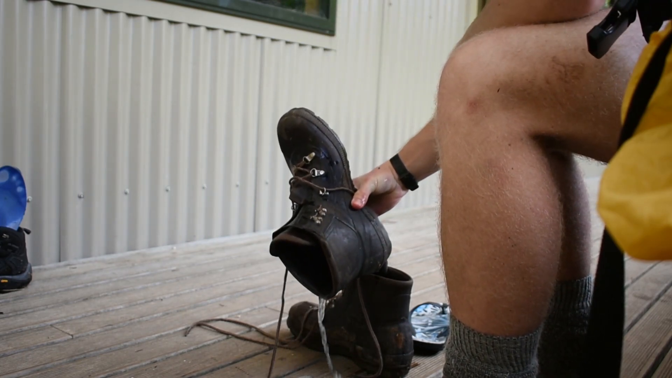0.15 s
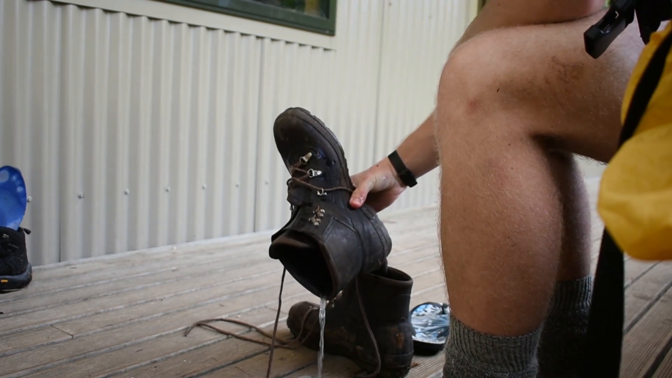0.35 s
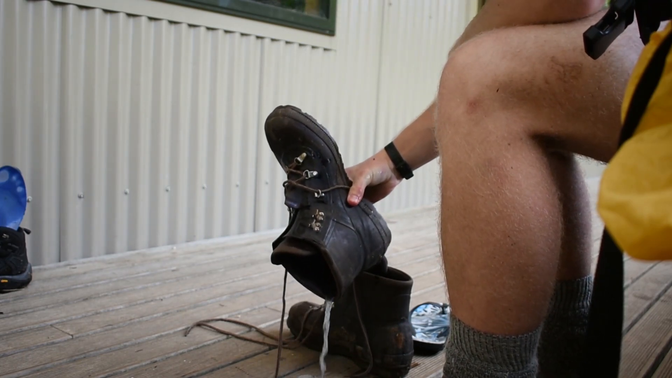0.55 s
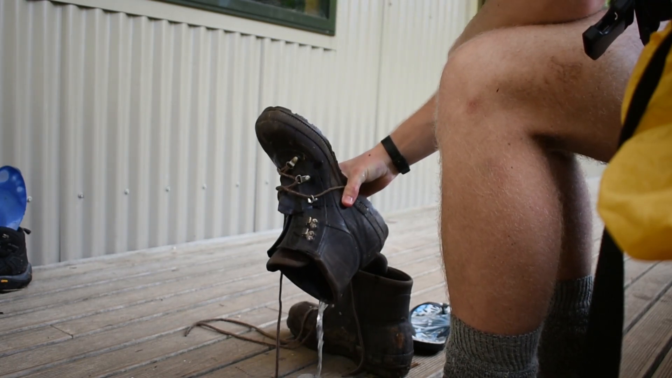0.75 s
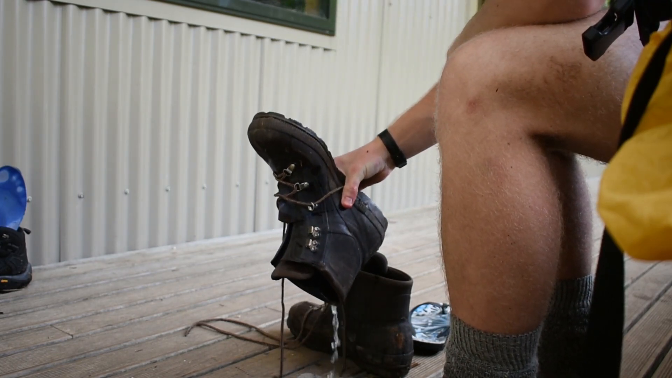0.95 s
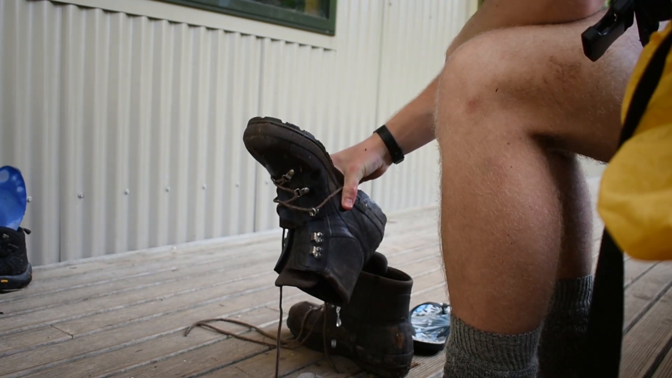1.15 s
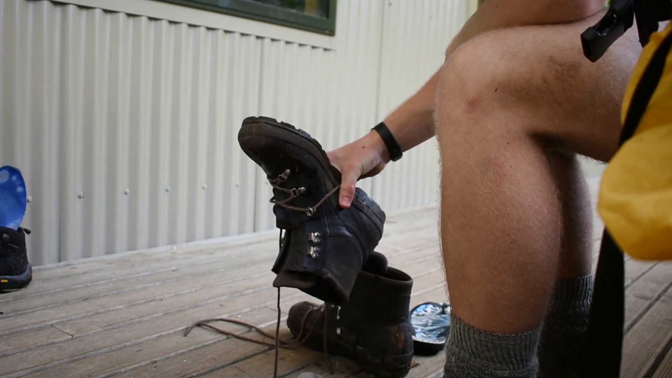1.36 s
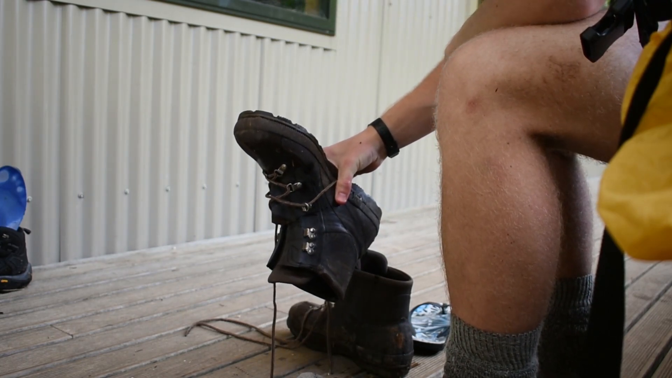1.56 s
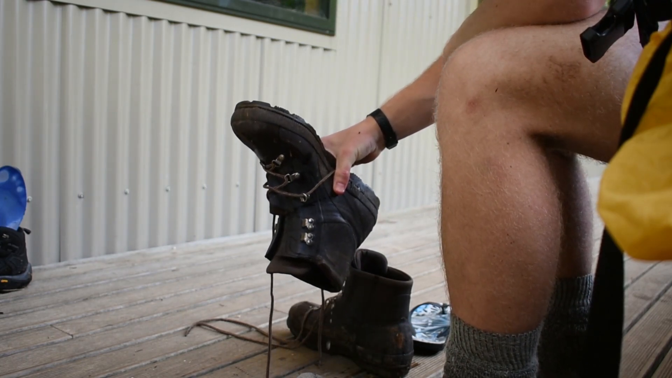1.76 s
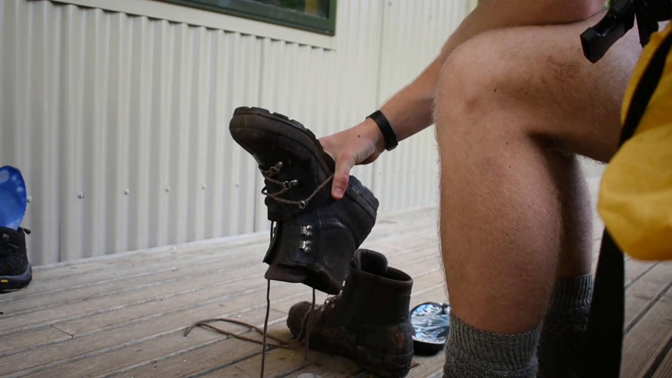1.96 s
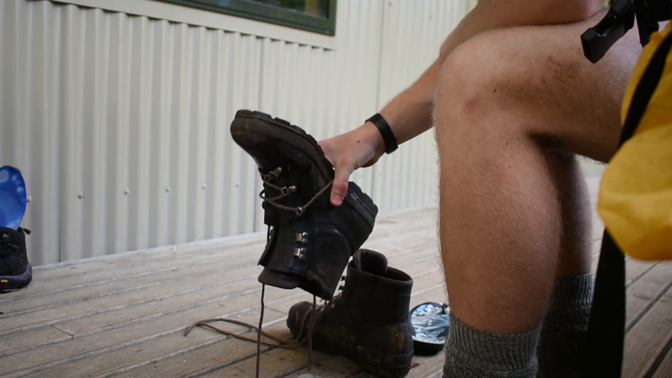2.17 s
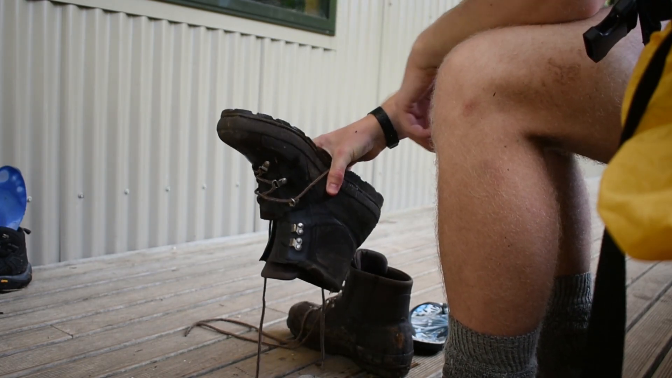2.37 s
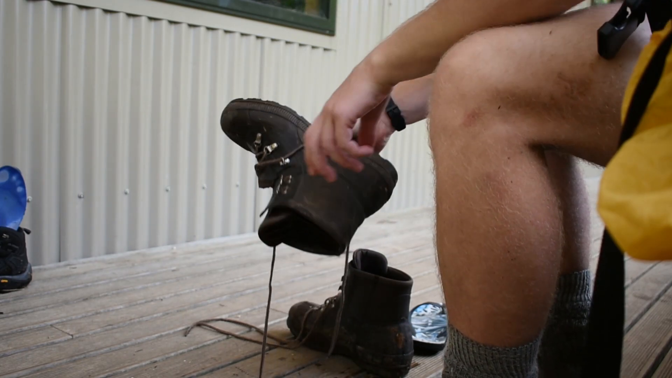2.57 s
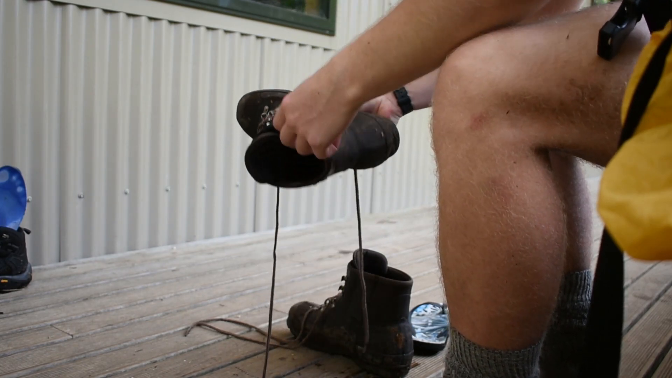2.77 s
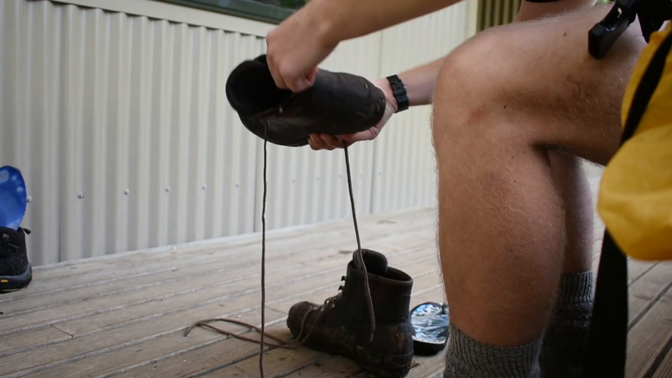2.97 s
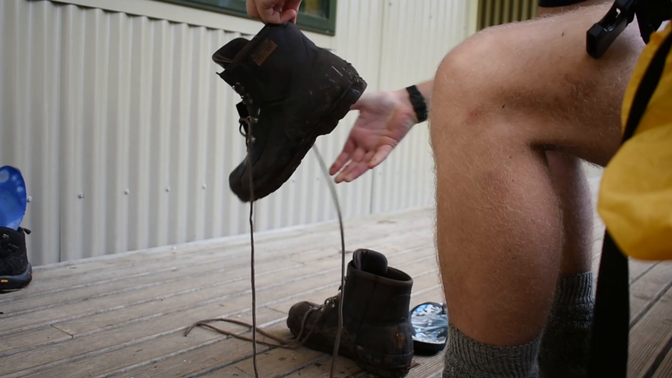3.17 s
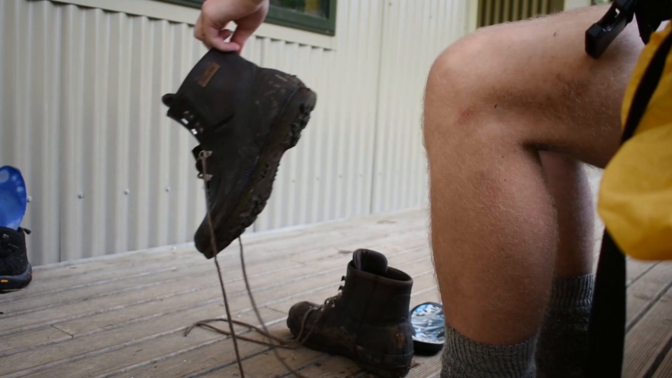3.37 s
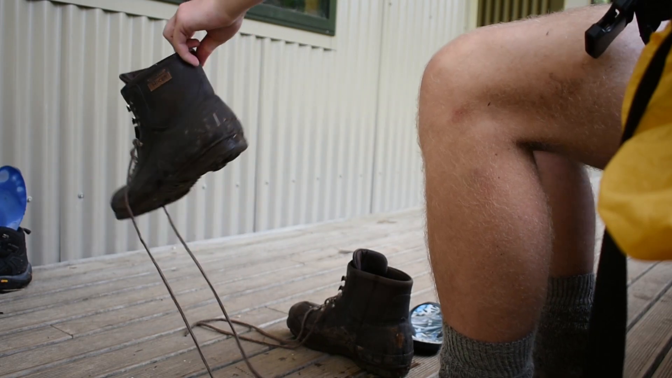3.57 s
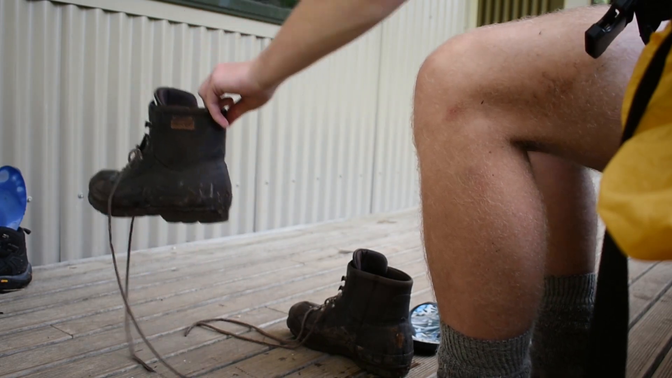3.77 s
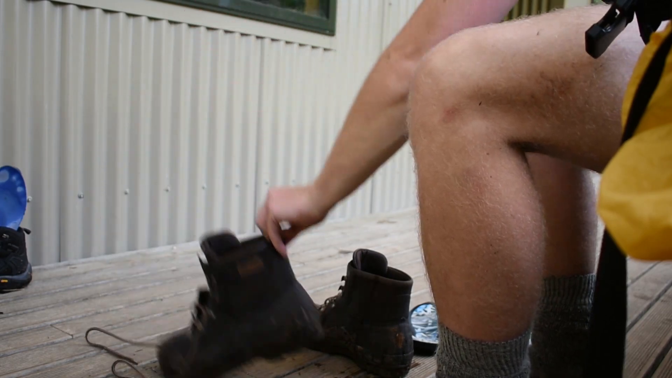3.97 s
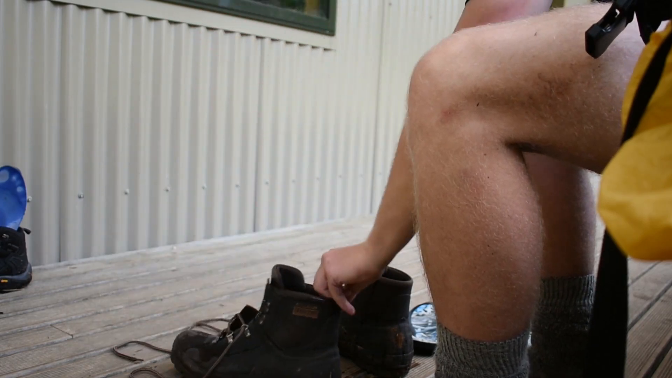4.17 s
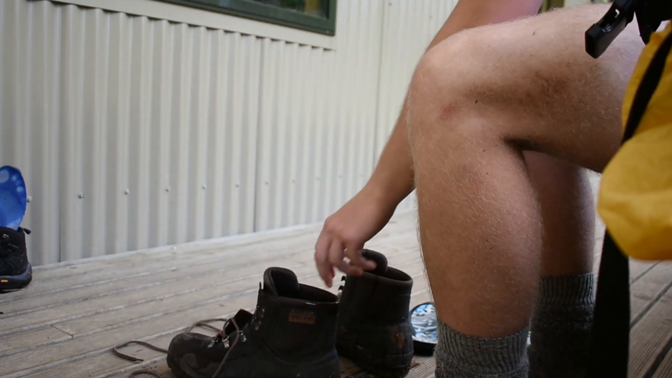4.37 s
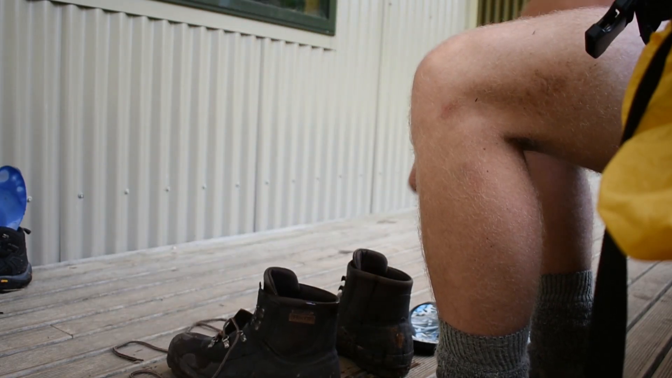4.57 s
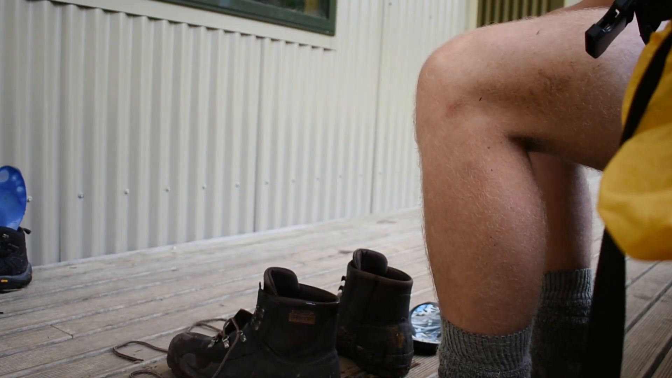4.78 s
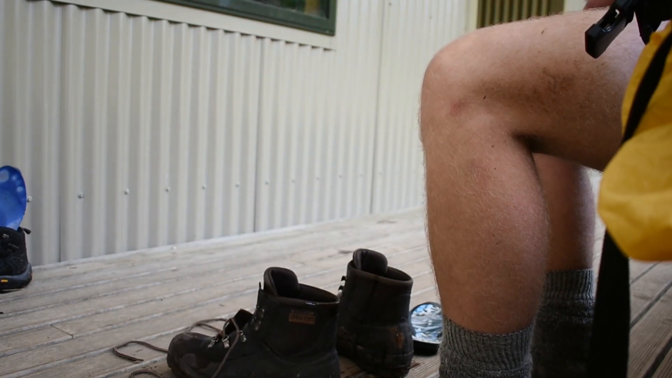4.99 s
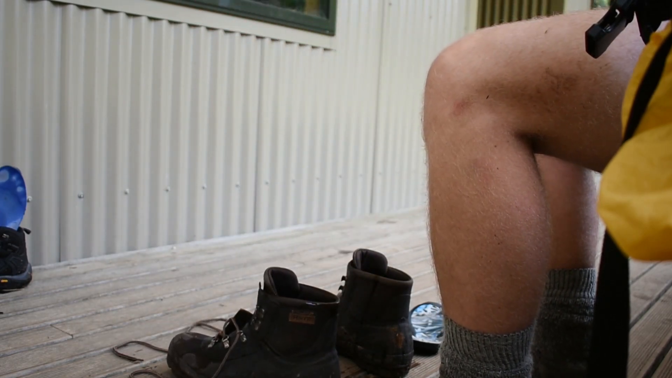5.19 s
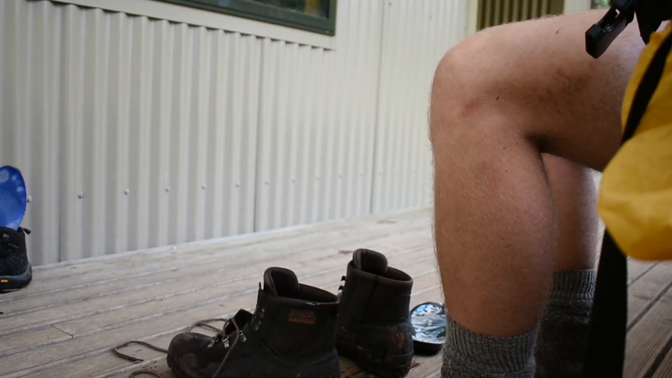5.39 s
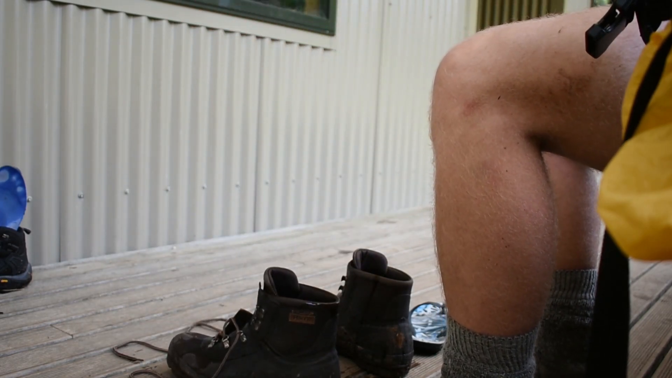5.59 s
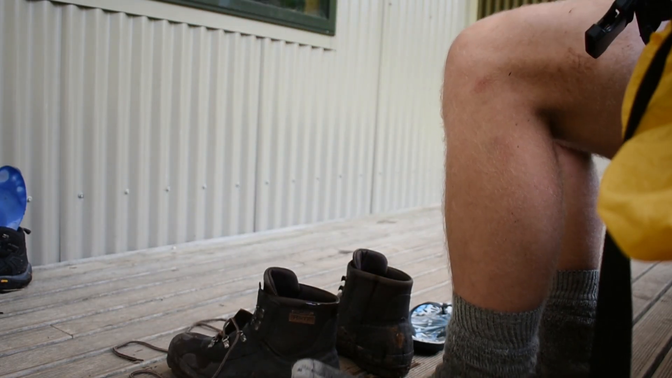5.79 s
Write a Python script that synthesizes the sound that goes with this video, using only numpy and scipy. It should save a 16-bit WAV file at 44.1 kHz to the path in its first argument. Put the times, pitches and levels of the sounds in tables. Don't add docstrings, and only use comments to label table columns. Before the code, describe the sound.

Bright wet splats and fine patter hit wooden planks a step away, strongest early, fading to a dribble. Leather rubs and fingers click on the boot, which then lands hard, planks and hollow leather ringing briefly with a bouncing metallic rattle. Afterwards come soft cloth scuffs on wood. Behind it, a shrill cicada repeats buzzes and chirps, hoarse birds call early, and thin whistles follow, with short porch reflections and a quiet airy background.

```python
import sys
import numpy as np
from scipy import signal
from scipy.fft import rfft, irfft
from scipy.io import wavfile
from scipy.ndimage import uniform_filter1d

SR = 44100
rng = np.random.default_rng(int(sys.argv[2]) if len(sys.argv) > 2 else 0)


def amplitude_ratio(level_db):
    exponent = np.asarray(level_db, float) / 20
    return 10 ** exponent


def waveform_to_disk(signal):
    frames = np.transpose(np.atleast_2d(signal))
    scaled = np.clip(frames, -1, 1) * 32767
    samples = np.round(scaled).astype(np.int16)
    wavfile.write(sys.argv[1], SR, samples)


N = 257544


def evened(x):
    return x / np.sqrt(np.mean(x ** 2) + 1e-20)


def wander(size, smooth):
    return evened(uniform_filter1d(rng.standard_normal(size), smooth))


def read(points, hz):
    f, value = np.transpose(points)
    return np.interp(np.log(hz + 1), np.log(f + 1), value)


def add(mix, s, sound):
    part = mix[round(s * SR):][:len(sound)]
    part += sound[:len(part)]


def coloured(x, points):
    gain = amplitude_ratio(read(points, np.fft.rfftfreq(len(x), 1 / SR)))
    return evened(irfft(rfft(x) * gain, len(x)))


def resonate(x, hz, width):
    turn = np.exp(2j * np.pi * np.cumsum(hz * np.ones(len(x))) / SR)
    r = np.exp(-np.pi * width / SR)
    return 2 * (turn * signal.lfilter([1 - r], [1, -r], x / turn)).real


def resonate_twice(x, hz, width):
    return resonate(resonate(x, hz, width), hz, width)


def grit(size, per_s, spread_db):
    chance = rng.random(size)
    sign = rng.standard_normal(size)
    big = rng.exponential(1, size)
    return (chance < per_s / SR) * sign * amplitude_ratio(spread_db * np.minimum(big, 4))


def swell(peak_s, db, rise, fall, depth_db, roundness=1):
    t = np.arange(-rise, 2 * fall, 1 / SR)[max(round((rise - peak_s) * SR), 0):]
    return max(peak_s - rise, 0), db + depth_db * np.where(t < 0, -t / rise, t / fall) ** roundness


def swells(rows, floor_db, depth_db):
    out = np.full(N, amplitude_ratio(floor_db))
    for row in rows:
        s, db = swell(*row, depth_db)
        add(out, s, amplitude_ratio(db) * signal.windows.tukey(len(db), .1))
    return out


def knocked(rows):
    out, t = np.zeros(N), np.arange(9000) / SR
    for s, db, hz, t60 in rows:
        note = np.sin(2 * np.pi * hz * t) * np.minimum(2 * hz * t, 1)
        add(out, s, amplitude_ratio(db - 60 * t / t60) * note)
    return out


def burst(db, hz, t60, share, tail_db, crack_s):
    t, hz = np.arange(5000) / SR, min(hz, 15000)
    spray = evened(resonate_twice(grit(len(t), 16000, 1.5), hz, share * hz))[::-1]
    crack = (t / crack_s) * np.exp(1 - t / crack_s)
    crack *= 2 / abs(spray[:round((3 * crack_s + 1 / hz) * SR)]).max()
    tail = amplitude_ratio(tail_db - 60 * t / max(t60, .005)) * np.minimum(t / crack_s, 1)
    return amplitude_ratio(db - 6.5) * spray * (crack + tail)


# frequency in Hz, level in dB per Hz.
VALLEY_HUSH = [(18, -28), (30, -28), (53, -48), (86, -16.5), (469, 1), (610, 0), (1210, 0.5), (3180, -4.5),
               (4470, -4.5), (4960, -7), (10300, -11), (13100, -12), (14500, -10.5), (15700, -10.5)]
# peak in seconds, level in dB, rise in seconds, fall in seconds.
BUMPS = [
    (2.86, -81, 0.079, 0.08),
    (3.78, -80.5, 0.063, 0.2203),
    (4.24, -65.5, 0.23, 0.38),
    (4.68, -72, 0.14, 0.252),
    (5.71, -83, 0.098, 0.0938),
]
# start in seconds, peak in dB, pitch in Hz, t60 in seconds.
HEEL_THUMPS = [
    (2.893, -63, 65, 0.15),
    (5.7, -72, 60, .2),
]


def hush():
    hush_db, rumble_db, bump_depth_db = -57, -93, -18
    waver = wander(N, 3000)
    air = coloured(rng.standard_normal(N), VALLEY_HUSH) * amplitude_ratio(hush_db + .5 * waver)
    rumble = evened(resonate_twice(rng.standard_normal(N), 56, 54))
    return air + knocked(HEEL_THUMPS) + rumble * swells(BUMPS, rumble_db, bump_depth_db)


# start in seconds, length in seconds, top pitch in Hz, peak in dB.
SQUAWKS = [
    (0.27, 0.048, 1173, -48.5),
    (1.015, 0.056, 1181, -49.5),
    (1.163, 0.043, 1200, -56),
    (1.743, 0.048, 1200, -49.5),
]
# level in dB of each overtone, from the fundamental up.
SQUAWK_OVERTONES = [-25, -6, 2, 1, -3, -9, -13]
# delay in seconds, level in dB.
SLOPE_ECHOES = [(.017, -11), (.034, -14), (.052, -20)]
# start in seconds, length in seconds, pitch in Hz, level in dB, fuzz in Hz.
WHISTLES = [
    (1.652, 0.039, 5130, -63, 180),
    (2.08, 0.085, 4550, -65, 34),
    (2.29, 0.1, 4505, -66.5, 19),
    (2.399, 0.13, 4430, -70, 26),
    (2.66, 0.13, 4180, -70, 60),
    (3.032, 0.093, 1831, -63.5, 14),
    (3.378, 0.57, 4170, -69.5, 60),
    (4.87, 0.043, 1280, -64.5, 20),
    (5.138, 0.022, 5200, -64, 30),
    (5.71, 0.078, 4500, -64, 19),
]


def squawk(length, top_hz, top_db):
    size = round(length * SR)
    u = np.linspace(0, 1, size)
    start, hoarse = .75, .25
    hz = top_hz * (start + (1 - start) * u ** .9)
    db = top_db + np.interp(u, [0, 0.75, 1], [-13, 0, 4])
    turns = np.cumsum(hz * (1 + 0.018 * wander(size, 90))) / SR
    stack = np.zeros(size)
    for k, level in enumerate(SQUAWK_OVERTONES):
        stack += amplitude_ratio(level + 2.2 * wander(size, 220)) * np.cos(2 * np.pi * (k + 1) * turns)
    stack = evened(stack) * (1 - hoarse + hoarse * wander(size, 40))
    flutter = 1 + 0.37 * wander(size, 150)
    return amplitude_ratio(db) * evened(stack) * flutter * signal.windows.tukey(size, .2)


def birds():
    out = np.zeros(N)
    for s, length, top_hz, top_db in SQUAWKS:
        call = squawk(length, top_hz, top_db)
        add(out, s, call)
        for delay, echo_db in SLOPE_ECHOES:
            add(out, s + delay, amplitude_ratio(echo_db + 4.4 * wander(len(call), 200)) * call)
    for s, length, hz, db, fuzz in WHISTLES:
        size = round(length * SR)
        waver = wander(SR, 500)[:size]
        tone = np.sin(2 * np.pi * np.cumsum(hz + fuzz * waver) / SR) * (1 + 0.27 * waver[::-1])
        add(out, s, amplitude_ratio(db) * evened(tone) * signal.windows.tukey(size, .4))
    return out


# buzz start in seconds, level in dB, slow ticking before it in
# seconds, thin high note in dB.
CICADA_PHRASES = [
    (.17, -54.5, .155, -60),
    (1.708, -54, .307, -61),
    (3.212, -53.5, .353, -70),
    (4.837, -52, .295, -62),
]
# start in seconds, level in dB.
CHIRPS = [(.507, -55), (.703, -53), (.917, -55), (1.136, -55), (1.328, -65), (2.059, -55), (2.26, -54.5),
          (2.46, -55), (2.663, -53), (3.542, -54.5), (3.732, -54.5), (3.927, -54.5), (4.324, -54),
          (4.495, -61), (5.154, -54.5), (5.344, -52.5), (5.539, -52), (5.744, -54)]
# frequency in Hz, width in Hz, level in dB.
TYMBAL = [(11200, 130, -9), (11860, 100, -9), (12340, 37, -6), (12800, 53, -2), (13200, 68, 4),
          (14600, 120, 1), (15000, 51, -2), (15000, 23, -4)]
# peak in seconds, level in dB, rise in seconds, fall in seconds.
FAR_CICADAS = [
    (.96, -63, 0.0446, 0.0884),
    (1.35, -69, 0.322, 0.1884),
    (1.97, -78.5, 0.1027, 0.077),
    (2.35, -73, 0.309, 0.598),
    (3.62, -62, 0.1318, 0.045),
    (3.89, -65, 0.1267, 0.09),
    (5.11, -67, 0.0505, .05),
    (5.6, -74, 0.1025, 0.089),
]


def cicada_ticks():
    ticks, t = np.zeros(N), np.arange(900) / SR
    tick = amplitude_ratio(-60 * t / 0.041) * np.minimum(t / .0007, 1)
    quicken_s, quicken, quickest_s, merge_s = -.062, .7, .0118, .075
    for buzz, _, lead, _ in CICADA_PHRASES:
        gap = 1 / 23
        times = list(np.arange(buzz + quicken_s, max(buzz - lead, 0), -gap)[::-1])
        while times[-1] < buzz + merge_s:
            gap = max(gap * quicken + .006 * (times[-1] < buzz - .05), quickest_s)
            times.append(times[-1] + gap)
        for s in times:
            add(ticks, s, amplitude_ratio(-53 + 18 * min(s - buzz, 0)) * tick)
    return ticks


def cicada():
    t, lower, upper, note = np.arange(N) / SR, np.zeros(N), np.zeros(N), np.zeros(N)
    buzz_s, upper_late_s = 0.18, .035
    sounds = [(s, db, 0.025, 0.0476, 0) for s, db in CHIRPS]
    sounds += [(s, db, buzz_s, 0.51, upper_late_s) for s, db, *_ in CICADA_PHRASES]
    for s, db, length, share, late in sounds:
        end = s + length
        lower += amplitude_ratio(db) * np.interp(t, [s, s + share * length, end, end + 0.021], [0, 0.7, 0.86, 0])
        upper_times = [s + late, s + min(share, .7) * length + late, end, end + 0.025]
        upper += amplitude_ratio(db) * np.interp(t, upper_times, [0.0032, 0.97, 0.8, 0])
    for s, _, _, note_db in CICADA_PHRASES:
        note += amplitude_ratio(note_db) * np.interp(t, [s + .02, s + .09, s + buzz_s, s + buzz_s + .01], [0, 1, 1, 0])
    ticks = cicada_ticks()

    turns = np.cumsum(180 * (1 + 0.017 * wander(N, 400))) / SR
    clicks = np.exp(-(turns % 1) / 0.12) + .5 * np.exp(-((turns + 0.35) % 1) / 0.3) + 0.39
    drive = clicks * rng.standard_normal(N)
    tone = sum(amplitude_ratio(db) * evened(resonate(drive, hz, width + 120)) for hz, width, db in TYMBAL)
    wide = coloured(drive, [(9500, -50), (11000, -6), (13000, 4.0), (13800, -3), (15000, 3.0),
                            (15800, -1.5), (17000, -41.5)])
    song = evened(evened(tone) + 0.94 * wide)
    low = signal.sosfiltfilt(signal.butter(4, 13800, fs=SR, output="sos"), song)
    near = low * (lower + ticks) + (song - low) * (upper + 0.27 * ticks)
    beads = 1 + 0.6 * np.cos(np.pi * turns)
    near += note * beads * evened(resonate_twice(drive, 14600, 260))
    others = coloured(rng.standard_normal(N), [(10500, -38.5), (12500, -1), (13500, 12), (15800, 3.0),
                                               (17000, -30)])
    return near + others * swells(FAR_CICADAS, -86, -11)


# frequency in Hz, t60 in seconds.
PORCH_DECAY = [(150, 0.59), (500, 0.31), (2000, 0.28), (8000, 0.28), (14000, 0.21)]


def porch(x):
    taps = np.zeros(SR // 2)
    at = np.arange(200, len(taps) - 20, 20)
    taps[at + rng.integers(0, 20, len(at))] = rng.choice([-1., 1.], len(at))
    hz, t, z = signal.stft(taps, SR, nperseg=256)
    decay = amplitude_ratio(-60 * t / read(PORCH_DECAY, hz)[:, None])
    tail = signal.istft(z * decay, SR, nperseg=256)[1]
    return signal.fftconvolve(x, tail / np.linalg.norm(tail))[:N]


# start in seconds, peak in dB,
# centre in Hz, width as a share of the centre.
TICKS = [(2.435, -41, 2876, 0.72), (2.44, -36, 2630, 0.46), (2.4455, -30, 2450, 0.22),
         (2.4513, -40.5, 1100, 1), (2.459, -48, 7230, 0.3), (2.461, -35.5, 2840, 0.34),
         (3.275, -33, 3500, 0.58), (3.2765, -33, 5400, 0.35), (3.6237, -37, 8300, 0.534),
         (3.693, -43, 9000, 0.6), (3.7127, -44, 3000, 1), (3.736, -39.5, 4500, 1), (3.832, -40.5, 1950, 1),
         (3.852, -43.5, 2030, 1), (4.0772, -31, 1170, 0.5), (4.0778, -31, 2200, 0.3),
         (4.0778, -27.5, 4515, 0.21), (4.1014, -24.5, 2200, 0.644), (4.0986, -25, 5502, 0.84),
         (4.1168, -30, 1640, 1), (4.1592, -32.5, 1500, 1), (4.264, -36, 850, 0.66), (5.539, -41, 6486, 1),
         (5.589, -42.5, 3587, 0.55)]
# start in seconds, peak in dB, centre in Hz.
HOOK_RATTLE = [
    (2.9816, -46, 8160),
    (3.0987, -42.5, 9649),
    (4.083, -22, 11200),
    (4.0914, -25, 9900),
    (4.1054, -27, 12280),
    (4.139, -32, 8500),
    (4.145, -28, 12520),
    (4.178, -26, 11200),
    (4.196, -32.5, 11200),
    (4.2574, -35.5, 11580),
]
# start in seconds, length in seconds, from Hz, to Hz, level in dB.
LACE_DRAG = (3.63, .12, 2200, 1000, -58)
# start in seconds, length in seconds, pitch in Hz, width in Hz, level in dB.
GRAZES = [(2.437, 0.037, 7000, 696, -54), (2.439, 0.022, 8300, 800, -60), (2.437, .03, 10500, 900, -65),
          (2.435, 0.025, 4300, 400, -60), (4.738, 0.044, 7200, 1200, -52), (4.743, 0.075, 5100, 600, -57),
          (4.805, 0.037, 6100, 990, -48.5), (4.802, 0.03, 8400, 1500, -48.5), (4.83, 0.035, 6100, 600, -58),
          (1.756, 0.015, 6700, 300, -56), (1.777, 0.02, 6080, 220, -53.5), (1.775, .05, 4650, 200, -55),
          (1.793, .025, 3720, 200, -54), (.338, .018, 2350, 200, -58), (5.655, .04, 3200, 900, -59),
          (5.59, .03, 3500, 700, -61)]
# peak in seconds, level in dB, rise in seconds, fall in seconds,
# low body in dB over that level.
RUBS = [(2.446, -52.5, 0.027, 0.1, 0.5), (2.62, -60.5, .2, 1, -13), (2.86, -60, 0.37, 0.1206, -13.5),
        (3.276, -55.5, 0.0073, 0.072, 3.5), (3.625, -45, 0.0049, 0.046, -9),
        (3.69, -63, 0.072, 0.3613, 4.5), (3.84, -64, 0.078, 0.1139, 0), (4.0789, -38.5, 0.0019, 0.049, 6.5),
        (4.13, -51, 0.048, 0.15, 3), (4.36, -64, 0.098, .25, 4.5), (4.7, -52.5, 0.077, 0.15, -6.5),
        (4.769, -46, 0.099, 0.097, -14.5), (4.825, -47, .1, 0.029, -14), (5.02, -51, 0.031, 0.059, 3),
        (5.06, -52, 0.082, 0.12, -12), (5.252, -46, 0.074, 0.056, -4), (5.284, -46, 0.041, 0.06, -7.5),
        (5.6, -63, .03, 0.066, -2), (5.67, -53, 0.11, 0.13, -8.5), (5.83, -56.5, 0.16, 0.0993, -10)]
# frequency in Hz, level in dB per Hz.
RUB_BODY = [(120, -33), (200, -7), (301, -2), (1010, 1.5), (1080, 1.5), (1730, -3), (3500, -9), (4550, -57),
            (7700, -120)]
# frequency in Hz, level in dB per Hz.
RUB_HISS = [(880, -28.5), (1500, -1), (2230, 2), (3180, 2.5), (3740, 3), (7560, 4), (10600, 1),
            (13000, -11.5)]


def rubs():
    out = np.zeros(N)
    for *stroke, body_db in RUBS:
        s, db = swell(*stroke, -20.5, 1.32)
        size = len(db)
        hz = np.clip(5170 + 87 * (db + 55), 3500, 7000)
        hiss = coloured(grit(size, 14000, 0.8), RUB_HISS)
        hiss = evened(hiss + 0.43 * evened(resonate(hiss, hz, 6200)))
        body = coloured(grit(size, 4000, 2.5), RUB_BODY)
        add(out, s, amplitude_ratio(db) * (hiss + amplitude_ratio(body_db) * body) * np.minimum(np.arange(size) / 40, 1))
    return out


def handling():
    out = rubs()
    for s, db, hz, share in TICKS:
        t60 = .04 + 80 / hz * amplitude_ratio(-.5 * max(db + 41, 0))
        add(out, s, burst(db, hz, t60, share, tail_db=-5.5, crack_s=0.0002))
    for s, db, hz in HOOK_RATTLE:
        add(out, s, burst(db, hz, t60=0.1, share=0.46, tail_db=-13.0, crack_s=0.00042))
    s, length, from_hz, to_hz, db = LACE_DRAG
    hz = np.geomspace(from_hz, to_hz, round(length * SR))
    slips = grit(9000, 5000, 1.8)[:len(hz)]
    add(out, s, amplitude_ratio(db) * evened(resonate_twice(slips, hz, 1500)) * signal.windows.tukey(len(hz), .4))
    for s, length, hz, width, db in GRAZES:
        band = resonate_twice(grit(6000, 9000, 1.7), hz, width)[2000:][:round(length * SR)]
        add(out, s, amplitude_ratio(db) * evened(band) * signal.windows.tukey(len(band), .5))
    return out


# start in seconds, peak in dB, contact time in seconds, share of the boot's
# hollow note in dB.
BLOWS = [(0.0, -53.5, 0.0023, -13), (2.444, -50, 0.00096, -7), (3.044, -54.5, 0.0043, -6),
         (3.148, -55, 0.0015, -8), (3.782, -47, 0.0013, -9), (3.79, -44, 0.0013, -12),
         (3.805, -46, 0.00045, -12), (4.0768, -24, 0.0004, -14), (4.0808, -16.5, 0.001, 4),
         (4.0969, -22.5, 0.00092, 3), (4.114, -29.5, 0.0012, -3), (4.129, -35, 0.0015, -9),
         (4.142, -28, 0.0015, -11), (4.152, -33, 0.0011, -10), (4.163, -37, 0.00092, -9),
         (4.178, -38, 0.0018, -12), (4.208, -42, 0.0011, -13), (4.263, -34, 0.0009, -10),
         (4.391, -46, 0.0015, -8), (5.014, -50.5, 0.0036, -15), (5.279, -49, 0.0036, -17)]
# frequency in Hz, level in dB, t60 in seconds.
DECK = [(185.5, -2, 0.12), (252, 1.5, 0.1), (300, 2, 0.172), (377.4, 11.5, 0.13), (160, -17, 0.12),
        (436, 3.5, .1), (490, -1, 0.19), (563, 2, 0.098), (609, 1.5, 0.077), (724, -7, 0.091),
        (822, 0, 0.086), (1080, -5, 0.04), (1380, -9, 0.04), (2200, 3, 0.05)]
# start in seconds, peak in dB, pitch in Hz, t60 in seconds.
KNOCKS = [(3.2749, -29, 2650, 0.011), (3.2765, -39, 1430, .03), (3.28, -40, 1710, .03),
          (3.2845, -45, 1650, .025), (3.29, -45, 1550, .03), (3.782, -43, 563, .03),
          (3.7895, -36.5, 576, .035), (3.796, -43, 600, .03), (3.8045, -42, 640, .03),
          (3.807, -49, 243, .11), (4.0759, -10, 800, .012), (4.0775, -41, 165, .12), (4.077, -14, 320, .03),
          (4.078, -25, 250, .07), (4.0925, -26, 375, .08), (4.1035, -24.5, 557, 0.047),
          (4.158, -36, 441, 0.092), (4.172, -36.5, 497, .08), (4.2625, -31, 450, .03),
          (4.279, -40, 300, .09), (4.391, -41, 420, .03), (4.403, -49, 330, 0.11),
          (2.4455, -33, 2480, .035), (2.447, -39, 2950, .03), (5.248, -45, 940, .04)]


def boards():
    out, t = np.zeros(N), np.arange(9000) / SR
    hollow, damping = 3, .55
    for s, db, contact, hollow_db in BLOWS:
        place_db = 1.2 * rng.standard_normal(len(DECK))
        place_db[hollow] += hollow_db
        load = 1 + .025 * rng.standard_normal()
        ring = np.zeros(len(t))
        for k, (hz, level, t60) in enumerate(DECK):
            decay = amplitude_ratio(level + place_db[k] - 60 * t / min(t60 * damping, .17))
            ring += (-1) ** k * decay * np.sin(2 * np.pi * hz * load * t)
        ring = np.convolve(ring, np.hanning(max(round(contact * SR), 3) + 2))
        add(out, s, amplitude_ratio(db) * ring / abs(ring).max())
    sole_cut = signal.butter(2, 167, "high", fs=SR, output="sos")
    return signal.sosfilt(sole_cut, out) + knocked(KNOCKS)


# start in seconds, peak in dB, centre in Hz, t60 of the # spray in seconds.
SPLATS_AND_DRIPS = [(0.048, -49, 7931, 0.0816), (0.0672, -44, 4000, 0.15), (0.084, -36, 11320, 0.1205),
                    (0.151, -36.5, 8700, 0.13), (0.3547, -42, 6233, 0.0788), (0.375, -38.5, 8300, 0.106),
                    (0.4399, -42, 7300, 0.1177), (0.632, -43.5, 5774, 0.073), (0.659, -39, 7295, 0.1),
                    (0.6933, -24, 7400, 0.086), (0.7065, -29, 9000, 0.085), (0.738, -38, 6072, 0.0636),
                    (0.7643, -23.5, 7366, 0.071), (0.7712, -27, 5107, 0.0608), (0.7835, -27, 8400, 0.0523),
                    (0.827, -32.5, 8900, 0.058), (0.8624, -36, 8633, 0.097), (0.9755, -27.5, 9640, 0.062),
                    (0.981, -35, 9500, 0.072), (0.9924, -34, 9690, 0.0587), (1.013, -35.5, 8000, 0.11),
                    (1.069, -32, 8110, 0.23), (1.092, -31.5, 5400, 0.067), (1.1393, -26, 6230, 0.051),
                    (1.1441, -30, 6100, 0.093), (1.267, -34, 9400, 0.13), (1.3049, -37, 7300, 0.1061),
                    (1.3736, -30, 8700, 0.11), (1.54, -42.5, 5900, 0.12), (1.644, -38, 8300, 0.078),
                    (.799, -34, 4000, .05), (0.8, -34, 9300, 0.045), (.8175, -37, 5200, .04),
         (0.816, -38, 9500, 0.043), (.819, -40, 2800, 0.08), (.838, -45, 1150, 0.065),
         (0.8577, -40, 5800, .05), (.867, -47, 2300, 0.03), (.874, -42, 5600, 0.037),
         (0.884, -42, 7600, .03), (.929, -49, 6970, .04), (0.956, -38, 7850, .05), (.412, -47, 7000, .04),
         (.091, -42, 10000, .04), (.168, -46, 8200, .04), (.151, -44, 4500, .03), (1.577, -47, 7000, .05),
         (.0645, -46, 2900, .03), (1.172, -45, 2800, .04), (.79, -40, 1500, .06), (.808, -41, 2000, .05),
         (1.02, -40, 7200, .04), (1.103, -42, 5000, .05), (0.002, -43, 9444, 0.24),
         (0.3382, -44, 7524, 0.0715), (0.7628, -34, 3020, 0.13), (1.0468, -42, 11000, 0.0584),
         (1.1371, -35.5, 3508, 0.068), (1.438, -46, 4873, 0.11), (1.9767, -50, 5293, 0.0827),
         (2.098, -46, 4930, 0.0805)]
# start in seconds, peak in dB, from Hz, to Hz, length in seconds.
POCKETS = [
    (0.7626, -25, 1980, 8670, 0.0044),
    (0.7655, -23, 9250, 10300, 0.0028),
    (0.7684, -31, 5700, 3930, 0.0034),
    (1.068, -37, 2219, 2608, 0.0034),
    (1.137, -40, 2484, 3013, 0.0039),
]
# peak in seconds, level in dB, rise in seconds, fall in seconds,
# low splash in dB over that level.
GUSHES = [
    (.33, -67, 0.0602, 0.215, 5),
    (.44, -59.5, 0.15, 0.66, -7),
    (0.768, -47, 0.05, 0.41, 1),
    (.875, -56, 0.13, 0.01401, 4),
    (1.045, -49, 0.083, 0.12, -20),
    (1.12, -58, 0.31, 0.55, 1),
    (1.39, -79, 0.25, 0.707, -10.5),
]


def water():
    out = np.zeros(N)
    for s, db, hz, t60 in SPLATS_AND_DRIPS:
        share = 0.5 - .008 * (db + 45)
        add(out, s, burst(db, hz, t60, share, tail_db=-5, crack_s=0.00051))
    for s, db, from_hz, to_hz, length in POCKETS:
        hz = np.linspace(from_hz, to_hz, round(length * SR))
        add(out, s, amplitude_ratio(db) * np.sin(2 * np.pi * np.cumsum(hz) / SR) * np.hanning(len(hz)))

    size, depth_db = 2 * SR, -48.5
    clumps = amplitude_ratio(0.967 * wander(size, 500))
    fizz = coloured(grit(size, 6000, 3), [(1500, -32), (3500, 6.0), (7000, 1.0), (10500, 3.0), (12500, -24),
                                          (16000, -40.5)])
    slosh = coloured(grit(size, 3500, 3), [(300, -29.0), (900, -12.5), (2800, -7.0), (4500, -30)])
    low_gushes = [(s, db + low_db, *shape) for s, db, *shape, low_db in GUSHES]
    flow = swells([g[:-1] for g in GUSHES], -100, depth_db)[:size]
    heavy = swells(low_gushes, -100, depth_db)[:size]
    add(out, 0, clumps * (flow * fizz + amplitude_ratio(-3.5) * heavy * slosh))

    dull = signal.sosfilt(signal.butter(6, 11300, fs=SR, output="sos"), out)
    spits = np.zeros(N)
    add(spits, 0, amplitude_ratio(16.5) * flow * np.diff(grit(size + 1, 290, 2.4)))
    return dull + amplitude_ratio(-19.5) * (out - dull) + np.convolve(spits, np.hanning(6))[:N]


def scene():
    wet, knocks, far = water() + handling(), boards(), birds() + cicada()
    echoes = porch(amplitude_ratio(-11.5) * wet + amplitude_ratio(-16.5) * knocks + amplitude_ratio(-7.5) * far)
    low_cut = signal.butter(5, 135, "high", fs=SR, output="sos")
    airborne = signal.sosfilt(low_cut, wet + knocks + far + echoes)
    return (airborne + hush())[None]


def band_limit(x):
    return signal.sosfilt(signal.butter(12, 16500, fs=SR, output="sos"), x)


def record(dry):
    edge = signal.firwin(601, 15780, window=("kaiser", 5), fs=SR)
    mix = signal.oaconvolve(dry, edge[None], "same")
    return band_limit(mix)


dry = scene()
out = record(dry)
waveform_to_disk(out)
```